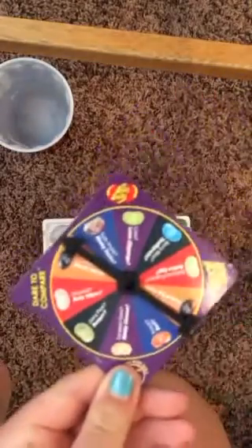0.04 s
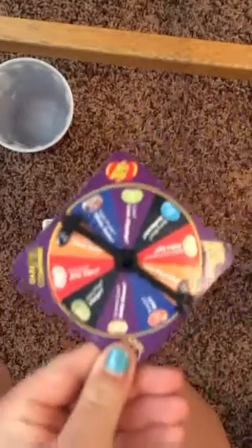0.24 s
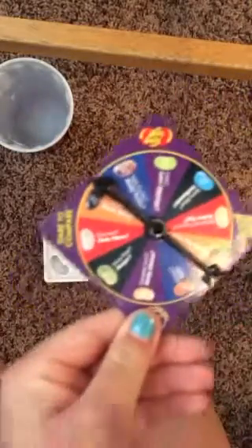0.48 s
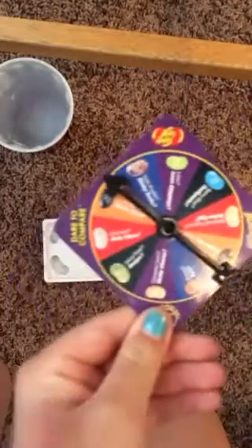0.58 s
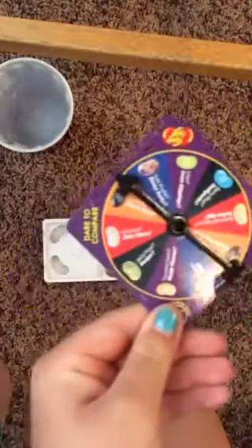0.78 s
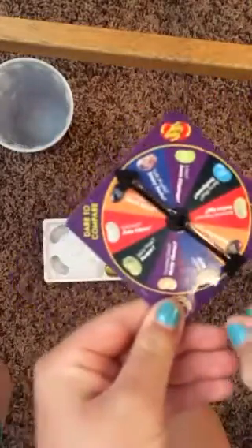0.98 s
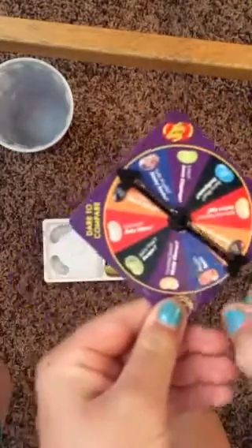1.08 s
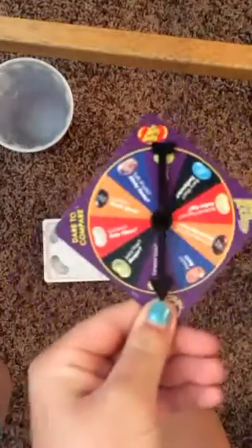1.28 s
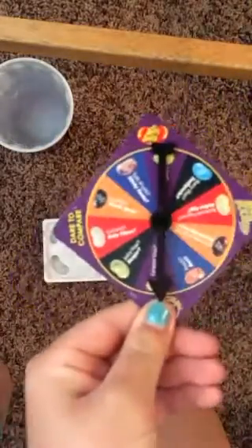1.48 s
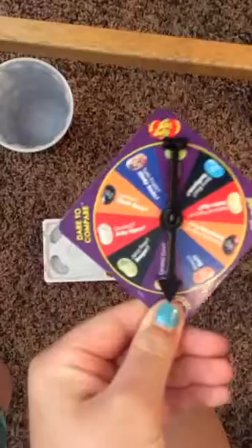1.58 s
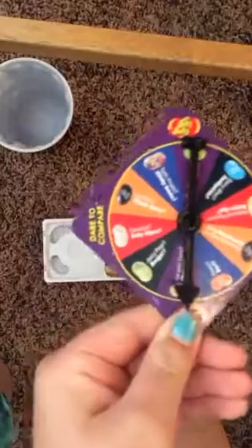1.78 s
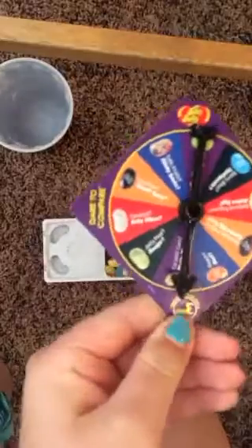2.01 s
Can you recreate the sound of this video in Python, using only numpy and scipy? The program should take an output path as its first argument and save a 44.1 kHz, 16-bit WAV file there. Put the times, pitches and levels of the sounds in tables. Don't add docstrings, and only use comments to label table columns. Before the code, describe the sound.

A fingernail flicks the plastic arrow of a card spinner: one sharp, short clacking rattle, close to the microphone. Before it, soft sleeve rustling and a small bump; afterwards, tiny skin ticks in a quiet, faintly humming room.

```python
import sys
import numpy as np
from scipy import signal
from scipy.io import wavfile

SR = 44100
rng = np.random.default_rng(int(sys.argv[2]) if len(sys.argv) > 2 else 0)


def wav_record(signal):
    frames = np.transpose(np.atleast_2d(signal))
    bounded = np.clip(frames, -1, 1)
    quanta = np.round(bounded * 32767).astype(np.int16)
    wavfile.write(sys.argv[1], SR, quanta)


def ratio(d):
    e = np.asarray(d, float) / 20
    return 10 ** e


N = 90360
TIME = np.arange(N) / SR


def rms_one(x):
    return x / np.sqrt(np.mean(x ** 2) + 1e-20)


def clicks_at(s, db, side=1):
    out = np.zeros(N)
    np.add.at(out, (np.asarray(s) * SR).astype(int), side * ratio(db))
    return out + 1e-18


def decay_per_sample(t60):
    return ratio(-60 / (t60 * SR))


def ring(clicks, hz, t60):
    r = decay_per_sample(t60)
    w = 2 * np.pi * hz / SR
    return signal.lfilter([0, np.sin(w)], [1, -2 * r * np.cos(w), r * r], clicks)


def puff(force, t60):
    return signal.lfilter([1], [1, -decay_per_sample(t60)], force)


def bandpass(x, low_hz, high_hz):
    return signal.sosfilt(signal.butter(2, [low_hz, high_hz], "band", fs=SR, output="sos"), x)


def swell(start, length):
    return np.sin(np.pi * np.clip((TIME - start) / length, 0, 1))


def drift(rate):
    r = np.exp(-80 * np.pi * rate / SR)
    slow = signal.lfilter([1], [1, -2 * r, r * r], rng.standard_normal(N // 40 + 2002))
    slow = rms_one(slow[2000:])
    return np.interp(np.arange(N) / 40, np.arange(len(slow)), slow)


def coloured(spectrum, patchy_db):
    hz, db = np.transpose(spectrum)
    white = rng.standard_normal((2, N))
    edges = 24 * 2 ** np.arange(0, 9.6, .5)
    out = np.zeros(N)
    for k, (low, high) in enumerate(zip(edges, edges[1:])):
        middle = np.log(low * high) / 2
        level = np.interp(middle, np.log(hz), db, left=-60, right=db[-1])
        out += ratio(level + patchy_db * drift(41)) * bandpass(white[k % 2], low, high)
    return rms_one(out)


# f/Hz, level/dB [dB per Hz]
AIR_COLOUR = [(25, -16.5), (60, 4.5), (130, -7), (330, -4.5), (500, -16), (1000, -15), (2500, -24),
              (15500, -30.5)]
# f/Hz, level/dB, waver/dB
HUM_TONES = [(120.6, -68, 1.8), (248, -83, 6.5), (294, -78.5, 1)]


def air():
    out = ratio(-65) * coloured(AIR_COLOUR, patchy_db=0.57)
    for hz, db, waver_db in HUM_TONES:
        out += ratio(db + waver_db * drift(7.6)) * np.sin(2 * np.pi * hz * TIME + 1.2 * drift(4))
    return out


# t/s, level/dB
ARM_LEVEL = [(0, -64.5), (.09, -61.5), (.2, -69), (.34, -64.5), (.47, -69.5), (.6, -64), (.71, -76),
             (.76, -68), (.88, -66.5), (.92, -72), (.97, -69), (1.03, -90), (1.301, -76.5), (1.9, -86.5),
             (2.05, -73.5)]
# f/Hz, level/dB [dB per Hz]
DRAG_COLOUR = [(150, -30), (250, 2), (369, 6.5), (594, -0.5), (726, -2.5), (993, -5), (1290, 0.5),
               (5000, -27), (6500, -45), (11000, -120)]
# start t/s, length t/s, level/dB
SLEEVE_SWISHES = [
    (.25, 0.055, -74),
    (0.302, 0.077, -67),
    (0.421, 0.018, -74),
    (0.523, .1, -98),
    (0.719, 0.095, -63.5),
    (0.791, 0.12, -62),
    (0.913, 0.1, -65),
    (1, 0.28, -74),
    (1.967, 0.093, -70),
]
# f/Hz, level/dB [dB per Hz]
SWISH_COLOUR = [(240, -51), (400, -18), (1100, -10), (1420, -19.5), (1540, 5), (1850, -15.5), (2710, -17),
                (15500, -29.5)]


def sleeve():
    s, db = np.transpose(ARM_LEVEL)
    drag = ratio(np.interp(TIME, s, db)) * coloured(DRAG_COLOUR, patchy_db=2.0)
    hollow_hz, hollow_width_hz = 735, 90
    hollow = bandpass(drag, hollow_hz - hollow_width_hz / 2, hollow_hz + hollow_width_hz / 2)
    strokes = sum(ratio(db) * swell(s, length) ** 0.54 for s, length, db in SLEEVE_SWISHES)
    return drag + ratio(2.0) * hollow + strokes * coloured(SWISH_COLOUR, patchy_db=2.0)


# t/s, level/dB, f/Hz, t60 [s]
SKIN_TICKS = [(.1985, -63, 14100, 0.005), (.650, -62, 13000, 0.0044), (1.212, -68, 10900, 0.06),
              (1.263, -52.5, 9500, 0.0044), (1.609, -61, 5200, .006), (1.609, -61, 3600, .006),
              (1.7115, -63, 11000, 0.0055), (1.7128, -53, 11760, 0.0047), (1.7153, -58, 12030, 0.0047),
              (1.720, -65, 11000, 0.0043), (1.7262, -58, 12600, .006), (1.7402, -46, 8930, 0.0062),
              (1.8222, -63, 14000, 0.0046), (1.962, -57, 1480, .02), (1.962, -57, 3650, .012),
              (2.004, -61, 1820, 0.023)]
# start t/s, length t/s, level/dB
THUMB_RUBS = [
    (1.615, 0.22, -74.5),
    (0.91, 0.047, -78),
]
# low f/Hz, high f/Hz, level/dB
THUMB_BANDS = [(4200, 5500, -3.5), (7100, 14400, 0)]


def hand():
    out = np.zeros(N)
    noise = rng.standard_normal((2, N))
    for s, db, hz, t60 in SKIN_TICKS:
        tick = puff(clicks_at([s], db), t60) * noise[0]
        low, high = hz * 0.8, min(hz * 1.25, 16000)
        tick = bandpass(bandpass(tick, low, high), low, high)
        out += tick * np.sqrt(SR / 2 / (high - low))
    rub = sum(ratio(db) * rms_one(bandpass(noise[1], low, high)) for low, high, db in THUMB_BANDS)
    slides = sum(ratio(db) * swell(s, length) for s, length, db in THUMB_RUBS)
    out += rub * ratio(2.5 * drift(30)) * slides
    bump_s, bump_db, bump_hz, bump_width_s = .8252, -40.5, 270, .0017
    age = TIME - bump_s
    bump = np.exp(-.5 * (age / bump_width_s) ** 2) * np.cos(2 * np.pi * bump_hz * age)
    return out - ratio(bump_db) * bump


# start t/s, length t/s, level/dB
NAIL_SQUEAKS = [
    (1.2535, .008, -54),
    (1.2655, .0085, -43),
]


def nail():
    squeak_hz = 4040 + 120 * drift(200)
    squeak = ratio(3.5 + 2.5 * drift(150)) * np.sin(2 * np.pi * np.cumsum(squeak_hz) / SR)
    squeak = squeak * sum(ratio(db) * swell(s, length) for s, length, db in NAIL_SQUEAKS)
    creak_db, creak_hz, creak_rise_s = -41.5, 940, 0.0052
    lead = ARROW_CONTACTS[0][0] - TIME
    creak = rms_one(bandpass(rng.standard_normal(N), creak_hz / 4, creak_hz * 2))
    creak = creak * (lead > 0) * np.exp(-np.abs(lead) / creak_rise_s)
    return squeak + ratio(creak_db) * creak


# t/s, card thud level/dB, arrow ring level/dB, crack level/dB
ARROW_CONTACTS = [(1.2740, -25, -29, -31), (1.2744, -15.5, -14, -18), (1.2767, -23, -27, -31),
                  (1.2797, -36.5, -31, -35.5), (1.2826, -31.5, -34, -28), (1.2840, -29.5, -25.5, -32),
                  (1.2899, -34, -21, -20), (1.2908, -30, -20.5, -31.5), (1.2950, -37.5, -46.5, -40),
                  (1.2985, -37, -43, -45.5), (1.3016, -20, -24, -28), (1.3027, -28.5, -23, -33),
                  (1.3080, -42.5, -36, -36), (1.3143, -36, -39, -45), (1.3180, -39, -50, -54),
                  (1.3320, -58, -62, -62)]
# f/Hz, level/dB, t60 [s]
CARD_TONES = [(646, -11.5, 0.023), (897, -12, .018), (965, -2, .022), (1101, -3, .02), (1322, -9, 0.018),
              (1439, -2, 0.031), (1750, -9, .008)]
# f/Hz, level/dB, t60 [s]
ARROW_TONES = [(2572, -5, .011), (3073, -7, 0.012), (3583, -5.5, .012), (4114, -7.5, .014),
               (4486, -1, 0.0079), (5590, -9.5, 0.011), (6250, -7.5, .011), (7200, -21.5, 0.0055)]
# f/Hz, level/dB, t60 [s]
FLEX_TONES = [(193, -24.5, .05), (307, -24.5, .05), (421, -30, .04)]
# t/s, level/dB
FLEX_PUSHES = [
    (1.272, 1),
    (1.2905, -16),
    (1.303, -18),
    (1.318, -23.5),
]


def scrape():
    start_s, length_s, level_db, fade_db, knocks_per_s = 1.275, .045, -37, 16.5, 3500
    age = (TIME - start_s) / length_s
    knocks = (rng.random(N) < knocks_per_s / SR) * rng.standard_normal(N)
    return knocks * (age > 0) * (age < 1) * ratio(level_db - fade_db * age)


def spinner():
    s, card_db, arrow_db, crack_db = np.transpose(ARROW_CONTACTS)
    luck = rng.standard_normal((len(s), len(CARD_TONES) + len(ARROW_TONES)))
    side = rng.choice([-1, 1], luck.shape)
    side[0], side[1], luck[:2] = -1, 1, 0
    grit = scrape()
    ringing = np.zeros(N)
    for k, (hz, db, t60) in enumerate(CARD_TONES + ARROW_TONES):
        force_db = card_db if k < len(CARD_TONES) else arrow_db
        strikes = clicks_at(s, force_db + db + 2.5 * luck[:, k], side[:, k])
        ringing += ring(strikes + grit * ratio(db), hz, t60)
    ringing = signal.sosfilt(signal.butter(4, 737, "high", fs=SR, output="sos"), ringing)
    burst = puff(clicks_at(s, crack_db) + np.abs(grit) * ratio(-14), 0.0049)
    crack = bandpass(burst * rng.standard_normal(N), 6200, 15000)
    crack = signal.lfilter(*signal.butter(1, 9600, fs=SR), crack)
    push_s, push_db = np.transpose(FLEX_PUSHES)
    flex = np.zeros(N)
    for k, (hz, db, t60) in enumerate(FLEX_TONES):
        flex += ring(clicks_at(push_s, push_db + db), hz, t60) * (-1) ** k
    return ringing + ratio(8.5) * crack + bandpass(flex, 130, 460)


def room(x):
    t60_s, wall_cut_hz = .36, 9000
    out = np.zeros(N)
    dull = np.exp(-2 * np.pi * wall_cut_hz / SR)
    for k, lag in enumerate((rng.uniform(.008, .03, 10) * SR).astype(int)):
        loop, state = x.copy(), [0.]
        gain = ratio(-60 * lag / SR / t60_s)
        for i in range(lag, N, lag):
            back, state = signal.lfilter([gain * (1 - dull)], [1, -dull], loop[i - lag:i], zi=state)
            loop[i:i + lag] += back[:N - i]
        out += (loop - x) * (-1) ** k
    return out


def scene():
    background = air() + sleeve() + hand()
    flick = nail() + spinner()
    echo = room(signal.lfilter(*signal.butter(1, 1200, "high", fs=SR), flick))
    return (background + flick + ratio(-33) * echo)[None]


def low_pass(x):
    return signal.sosfilt(signal.butter(12, 16300, fs=SR, output="sos"), x)


def record(dry):
    top_cut = signal.cheby2(10, 50, 15600 * 1.04, fs=SR, output="sos")
    mix = signal.sosfilt(top_cut, dry)
    return low_pass(mix)


dry = scene()
out = record(dry)
wav_record(out)
```